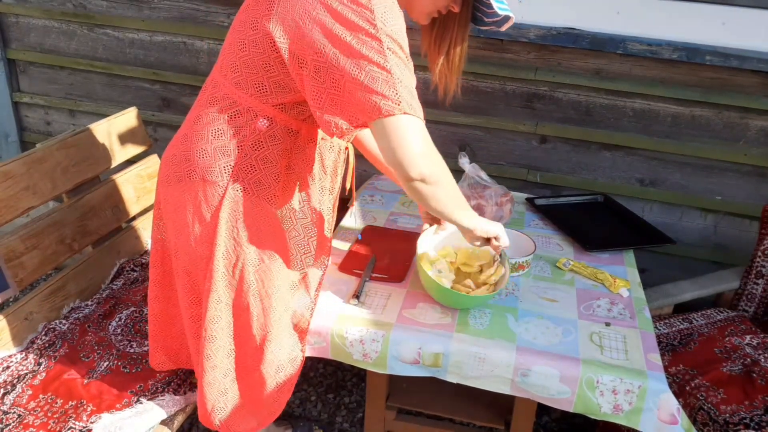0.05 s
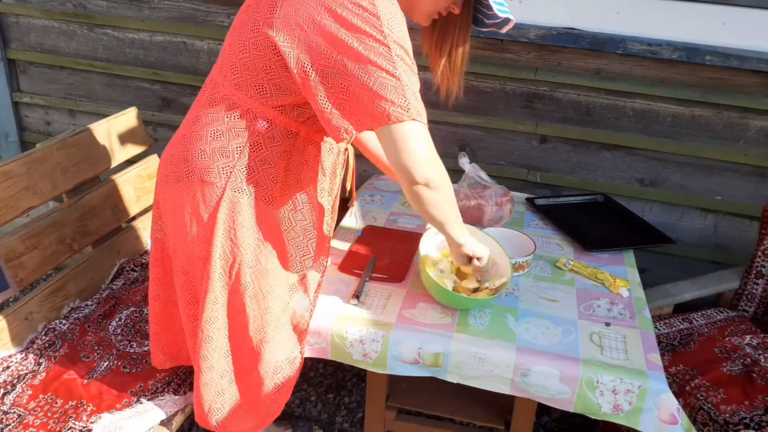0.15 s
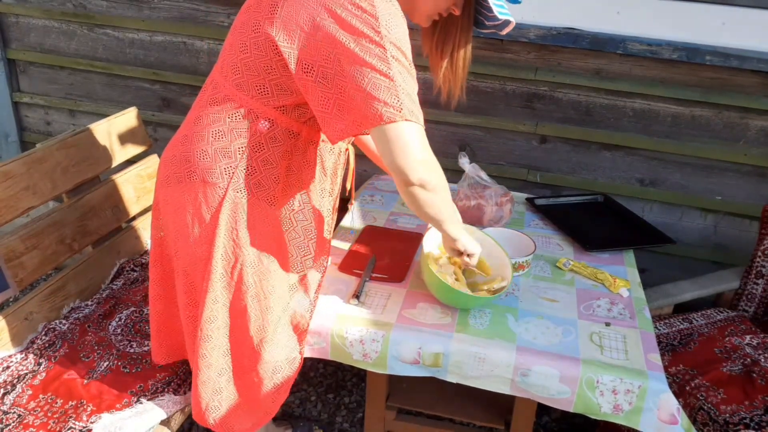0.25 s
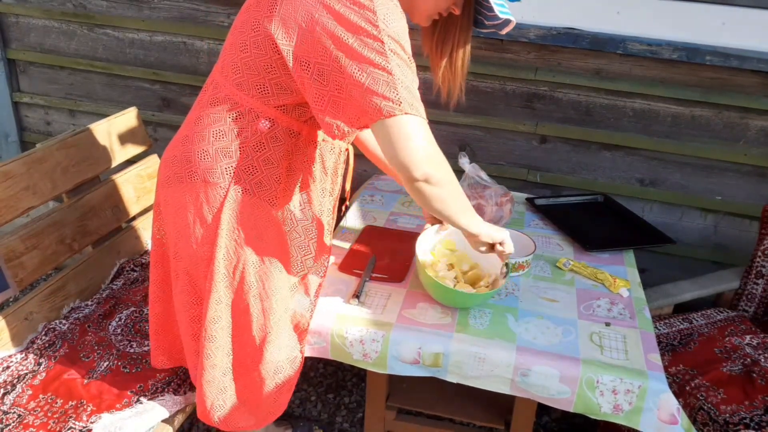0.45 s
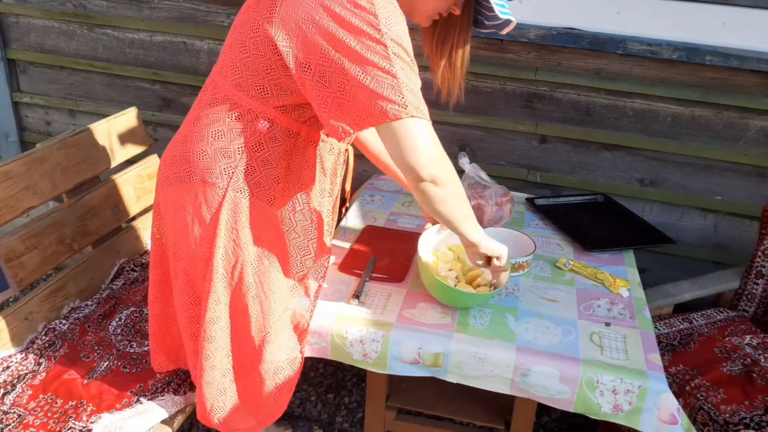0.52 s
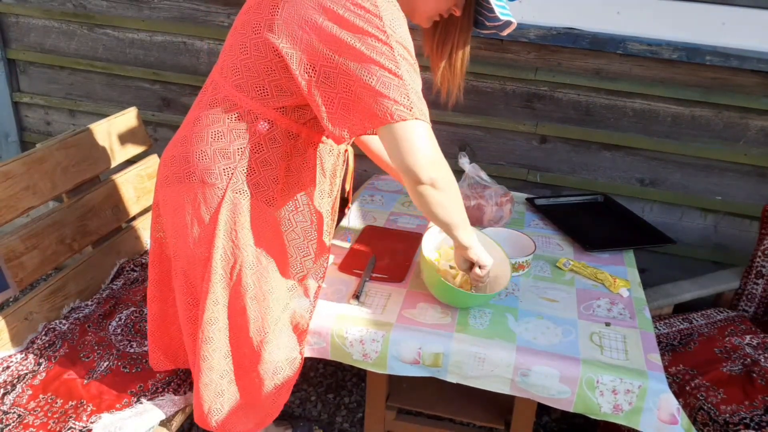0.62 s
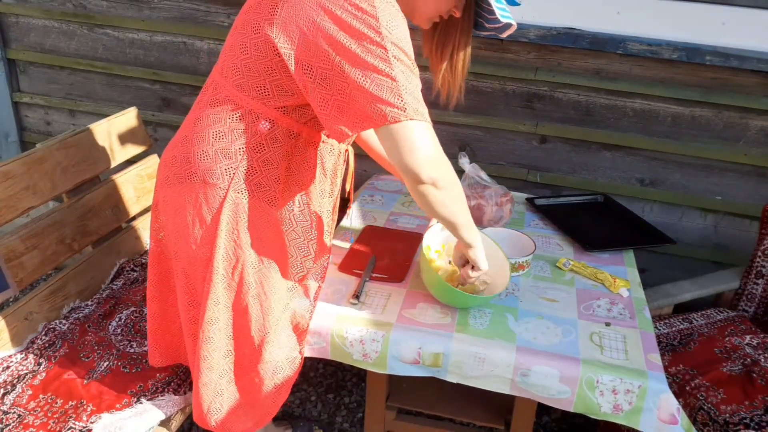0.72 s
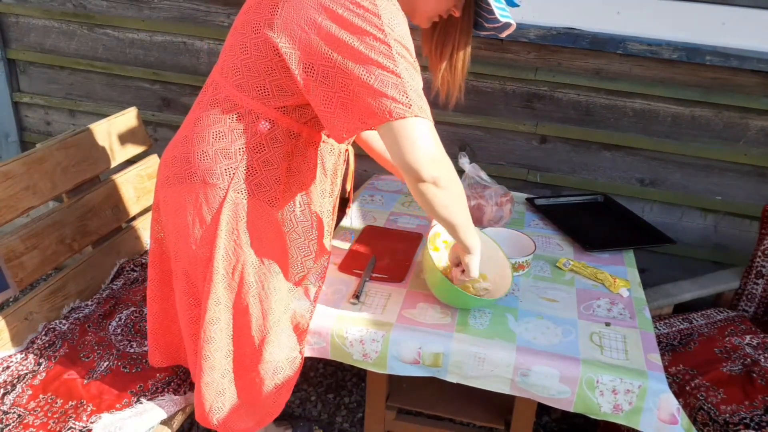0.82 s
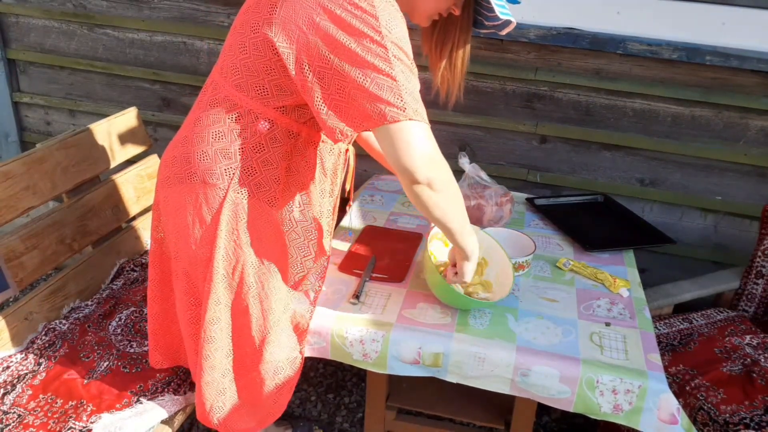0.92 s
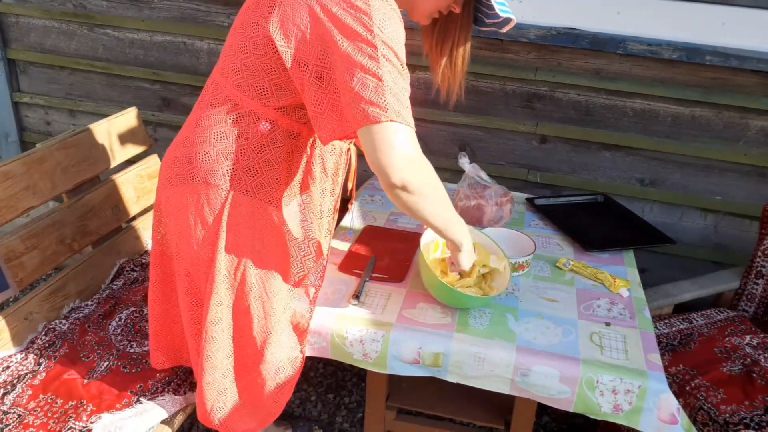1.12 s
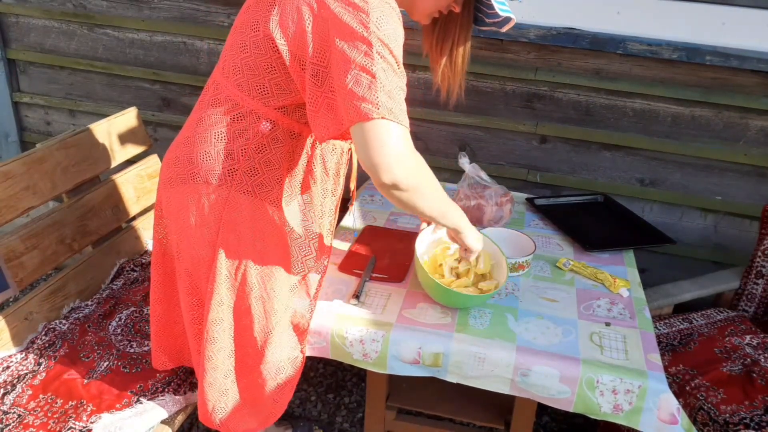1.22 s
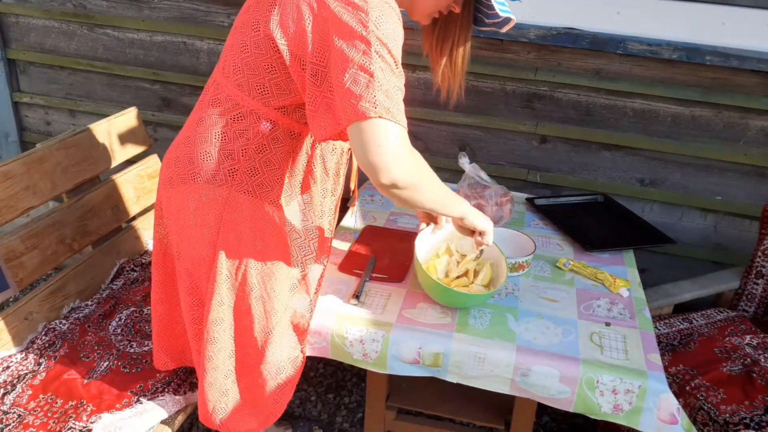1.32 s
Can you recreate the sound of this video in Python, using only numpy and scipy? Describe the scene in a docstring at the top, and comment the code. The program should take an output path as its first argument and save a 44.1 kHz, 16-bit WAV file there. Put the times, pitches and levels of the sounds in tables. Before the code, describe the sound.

Moist food is mixed by hand in a plastic bowl, close and slightly to the right. At about 0.2 seconds a squelch and dull knock sound, with a faint boom from the table and soft plops. More wet knocks and rubbing follow from 0.5 to 0.9 seconds, each with a quiet yard echo. After that, only very soft handling remains over a faint outdoor hush and low rumble.

```python
"""A faint outdoor hush and a low rumble come first, then moist food being turned by hand in a plastic bowl.
Fingers rub softly, and the wet pieces squelch and plop against the wall, making it ring briefly.
The bowl knocks on a garden table, whose top booms faintly under it.
Fences and a house wall throw each knock and plop back as quiet echoes."""
import sys
import numpy as np
from scipy import signal
from scipy.fft import rfft, irfft
from scipy.io import wavfile

SR = 44100
rng = np.random.default_rng(int(sys.argv[2]) if len(sys.argv) > 2 else 0)


def log_audio(samples):
    """Write samples as a 16-bit WAV file to the path given in sys.argv[1]."""
    # one column per channel
    frames = np.atleast_2d(samples).T
    # limit to full scale, then quantise
    limited = np.clip(frames, -1, 1)
    pcm = np.round(limited * 32767).astype(np.int16)
    wavfile.write(sys.argv[1], SR, pcm)


N = 59535
T = np.arange(N) / SR
BOWL_PAN_DB, LOW_PAN_DB = 2.4, 4.5   # how far the bowl and the deep sounds lean to the right


def from_db(db):
    """Turn decibels into a number to multiply by."""
    return 10 ** (np.asarray(db) / 20)


def rms_one(x):
    """Scale a sound so its average strength (rms) is 1."""
    return x / np.sqrt(np.mean(x ** 2) + 1e-20)


def at_hz(points, hz):
    """Read between the rows of a table, giving each octave equal room."""
    pitches, values = np.transpose(points)
    return np.interp(np.log(hz + 1e-9), np.log(pitches), values)


def keep_side(x, hz, side, order=2):
    """Keep the "low" or "high" side of hz; a higher order cuts more steeply."""
    return signal.sosfilt(signal.butter(order, hz, side, fs=SR, output="sos"), x + 1e-18)


def delayed(x, seconds):
    """The same sound, later."""
    return np.interp(T - seconds, T, x, left=0)


def to_right(db):
    """Turn the left channel down and the right one up."""
    return from_db([[-db], [db]])


def ring(hz, db, ring_s):
    """One struck tone; its ring time is how long it takes to fade by 60 dB."""
    return from_db(db - 60 * np.minimum(T / ring_s, 4)) * np.sin(2 * np.pi * hz * T)


def coloured(noise, colour):
    """Give noise a colour: make some pitches stronger than others."""
    gains = from_db(at_hz(colour, np.fft.rfftfreq(N, 1 / SR)))
    return rms_one(irfft(rfft(noise) * gains, N))


def stereo_noise(likeness):
    """White noise whose left and right are unrelated (0), the same (1) or in between."""
    mid, side = rng.standard_normal((2, N))
    return rms_one(np.sqrt(1 + likeness) * mid + np.sqrt(1 - likeness) * side * np.array([[1], [-1]]))


# colour of the hush (pitch [Hz], relative level [dB])
HUSH_COLOUR = [(88, -35.5), (150, -3.5), (315, -2.5), (534, -17.5), (716, -8.5), (821, -10.5), (998, -22.5),
               (1560, -5), (2100, -17.5), (2270, -24), (4320, -28), (8730, -31), (16000, -36)]
def hush(level_db=-68.5):
    """A steady, faraway outdoor hush."""
    noise = coloured(stereo_noise(0.13), HUSH_COLOUR)
    return from_db(level_db) * rms_one(keep_side(noise, 260, "high")) * to_right(4)


# colour of the rumble (pitch [Hz], relative level [dB])
RUMBLE_COLOUR = [(20, -19.5), (40, -25), (60, 0), (80, -6.5), (108, 4), (150, -5), (250, -39), (500, -26),
                 (2000, -82.5)]
# its rise and fall (time [s], relative level [dB])
RUMBLE_SWELLS = [(0, -66), (.09, -67.5), (.145, -55), (.19, -55), (.29, -60), (.37, -68.5), (.43, -63),
                 (.49, -69.5), (.58, -66.5), (.92, -76.5), (1.02, -61.5), (1.09, -70), (1.2, -70),
                 (1.29, -55), (1.35, -72)]
def rumble(gain_db=-3):
    """A low rumble that comes and goes."""
    loudness = from_db(gain_db + np.interp(T, *np.transpose(RUMBLE_SWELLS)))
    return loudness * coloured(stereo_noise(0.45), RUMBLE_COLOUR) * to_right(LOW_PAN_DB)


# strokes round the bowl (start [s], length [s], centre pitch [Hz], level [dB])
RUB_STROKES = [(0.033, 0.0092, 8000, -70.5), (0.382, 0.12, 998, -65), (0.522, 0.18, 337, -64),
               (0.819, 0.0096, 4250, -62.5), (0.821, 0.024, 2800, -49), (0.867, 0.13, 225, -65),
               (0.907, 0.18, 330, -71), (1.106, 0.037, 8000, -85.5), (1.312, .04, 7500, -80.5)]
def rubs(width_ratio=1.1):
    """Fingers and food rub the bowl: soft swells of noise, each around its own pitch."""
    out = 0
    for start, length, hz, db in RUB_STROKES:
        noise = keep_side(stereo_noise(0.49), hz * width_ratio, "low", order=3)
        noise = keep_side(noise, hz / width_ratio, "high", order=3)
        swell = np.sin(np.pi * np.clip((T - start) / length, 0, 1))
        out += from_db(db) * rms_one(noise) * swell
    return out * to_right(BOWL_PAN_DB)


# each squelch (start [s], fade time [s], level [dB])
SQUELCH_BURSTS = [(0.18, 0.075, -54.5), (0.507, 0.067, -54), (0.613, 0.017, -52), (.70, 0.24, -67),
                  (0.807, 0.047, -52.5), (0.899, 0.024, -67)]
# colour of the wet clicks (pitch [Hz], relative level [dB])
SQUELCH_COLOUR = [(1000, -4.5), (2000, 9.5), (3200, 0), (5000, -4), (8500, -7.5), (10500, -14.5),
                  (15000, -13)]
def squelches(rise_s=0.0017, clicks_per_s=8800, spread_db=2.5):
    """Wet food slides and parts in clouds of tiny clicks that swell quickly and fade."""
    loudness = 0
    for start, fade_s, db in SQUELCH_BURSTS:
        age = np.maximum(T - start, 0)
        loudness += from_db(db) * (1 - np.exp(-age / rise_s)) * np.exp(-age / fade_s)
    sizes = from_db(spread_db * np.minimum(rng.exponential(1, N), 4))
    clicks = (rng.random(N) < clicks_per_s / SR) * sizes * stereo_noise(0.1)
    return loudness * coloured(clicks, SQUELCH_COLOUR) * to_right(BOWL_PAN_DB)


# the bowl's own tones (pitch [Hz], relative level [dB], ring time [s])
WALL_TONES = [(253, -24.5, 0.044), (370, -6, 0.014), (623, -4.5, 0.017), (847, -1, 0.011),
              (1256, -2.5, 0.013), (1928, -9, 0.011), (2477, -14.5, .014), (3600, -19.5, .012),
              (5120, -21, .012), (5920, -23, .012), (6740, -19.5, 0.00826)]
def bowl_wall():
    """The plastic wall rings very briefly when struck; every other tone starts the opposite way."""
    return sum((-1) ** k * ring(*tone) for k, tone in enumerate(WALL_TONES))


# soft plops, and dull returns of the knocks from the garden walls (time [s], bowl gain [dB],
# blur time [s], treble limit [Hz], hollow pitch [Hz], hollow level [dB], hollow ring time [s])
SOFT_PLOPS_AND_ECHOES = [(0.1835, -34.5, 0.00077, 6760, 1794, -38, .03),
                         (.2615, -30.5, 0.008, 2660, 1245, -31, 0.054),
                         (.2770, -28, 0.0037, 2000, 1280, -29, 0.024),
                         (.3050, -51, 0.006, 1477, 692, -42.5, 0.043),
                         (.3440, -41, 0.0084, 1760, 1282, -43, 0.033),
                         (.5070, -68, .004, 2500, 362, -52.5, 0.084),
                         (.5555, -39, 0.0089, 4960, 1380, -48, 0.028),
                         (.5640, -43.5, 0.0083, 2000, 728, -46.5, 0.12),
                         (0.6115, -42.5, 0.015, 4000, 1760, -47, 0.057),
                         (0.691, -43, 0.0021, 1200, 548, -45.5, 0.076),
                         (.7270, -32, 0.0059, 1336, 571, -41, 0.055),
                         (0.7502, -32.5, 0.0082, 1640, 795, -41.5, 0.041),
                         (0.7891, -31, 0.0023, 2670, 778, -40.5, 0.13),
                         (.8165, -26.5, 0.0027, 5900, 1126, -28, 0.057),
                         (.8235, -28.5, 0.002, 5870, 741, -38.5, 0.11),
                         (0.8286, -29, 0.0074, 3400, 390, -50, 0.042),
                         (.8465, -39, 0.0098, 3000, 670, -25, 0.029),
                         (1.106, -62, 0.004, 3220, 359, -53.5, 0.02),
                         (1.191, -63.5, 0.0064, 1217, 584, -56, 0.049),
                         (1.227, -57.5, 0.012, 1200, 573, -57, 0.046),
                         (1.307, -59.5, .008, 1210, 640, -61.5, 0.068)]
def plops_and_echoes(wall, rise_s=0.00088, taps_per_s=1600):
    """Soft plops and dull echoes of the knocks: the bowl's ring, blurred, plus a hollow tone."""
    out = np.zeros(N)
    for start, db, blur_s, treble_hz, hollow_hz, hollow_db, ring_s in SOFT_PLOPS_AND_ECHOES:
        taps = (rng.random(N) < taps_per_s / SR) * rng.standard_normal(N)
        swell = T * np.exp(-np.minimum(2 * T / blur_s, 60))
        blurred = signal.fftconvolve(taps * swell, wall)[:N]   # one copy of the ring for each tiny tap
        blurred *= from_db(db) * np.std(wall) / (np.std(blurred) + 1e-30)
        hollow = ring(hollow_hz, hollow_db, ring_s) * (1 - np.exp(-T / rise_s))
        out += delayed(keep_side(blurred + hollow, treble_hz, "low"), start)
    return out


# hard hits (time [s], bowl gain [dB], bass limit [Hz], treble limit [Hz], hollow pitch [Hz],
# hollow level [dB], hollow ring time [s], clack pitch [Hz], clack level [dB], tick level [dB])
BOWL_KNOCKS = [(0.2071, -9, 232.3, 2900, 616, -17.5, 0.028, 3650, -49, -40.5),
               (.2098, -22.5, 400, 3000, 1285, -23.5, 0.027, 1930, -22, -39.5),
               (.2121, -12.5, 260, 1110, 577, -22.5, 0.023, 2540, -30, -50.5),
               (.5033, -33, 487, 3620, 1000, -34.5, 0.071, 4700, -42.5, -40.5),
               (0.5046, -20.5, 1400, 2300, 1610, -20.5, 0.012, 2150, -24, -39.5),
               (0.6563, -18.5, 310, 1840, 731, -33, 0.028, 2780, -27, -43.5),
               (.6615, -28, 285, 1210, 796, -29, 0.023, 1390, -36, -49),
               (.7995, -27, 2030, 4430, 676.4, -25, 0.067, 2130, -18, -28)]
def knocks(wall, clack_s=0.005, tick_hz=8200, tick_s=0.0025):
    """Each knock rings the bowl and the hollow between food and hand, with a clack and a wet tick."""
    out = np.zeros(N)
    for (start, db, bass_hz, treble_hz, hollow_hz, hollow_db, ring_s,
         clack_hz, clack_db, tick_db) in BOWL_KNOCKS:
        body = from_db(db) * keep_side(keep_side(wall, treble_hz, "low"), bass_hz, "high")
        hollow = keep_side(ring(hollow_hz, hollow_db, ring_s), treble_hz, "low")
        clack = keep_side(ring(clack_hz, clack_db, clack_s), clack_hz / 2, "high")
        tick = keep_side(ring(tick_hz, tick_db, tick_s), tick_hz / 2, "high")
        out += delayed(body + hollow + clack + tick, round(start * SR) / SR)
    return out


# the table top's own tones (pitch [Hz], level [dB], ring time [s])
TABLE_TONES = [(62, -55, 0.28), (115, -64.5, .3), (162, -53, 0.24)]
# moments when it gives under the bowl (time [s], gain [dB])
TABLE_THUMPS = [(0.207, 0), (0.533, -7), (0.798, -6.5)]
def table_booms(rise_s=0.015):
    """The table top booms faintly when the bowl is pressed down."""
    boom = sum(ring(*tone) for tone in TABLE_TONES) * (1 - np.exp(-T / rise_s))
    return sum(from_db(db) * delayed(boom, start) for start, db in TABLE_THUMPS) * to_right(LOW_PAN_DB)


def echo_fade(delay_s, db, ring_s):
    """The fading outline of a spray of tiny echoes; db sets its total energy."""
    fade = (T >= delay_s) * from_db(-60 * np.clip((T - delay_s) / ring_s, 0, 4))
    return from_db(db) * fade / np.sqrt(np.sum(fade ** 2))


# colours of the scattered sound and of the wall echoes (pitch [Hz], relative level [dB])
SCATTER_COLOUR = [(100, -5.5), (220, -5.5), (370, 3.5), (630, -2.5), (850, -0.5), (1200, -1), (2500, 5),
                  (5000, -3), (12000, -1)]
ECHO_COLOUR = [(150, -11.5), (400, -1), (700, -12.5), (1250, -2), (2500, -0.5), (5000, -20), (15000, -19.5)]
# echoes off the fences and house wall (delay [s], level [dB], ring time [s])
WALL_ECHOES = [(.054, -29.5, .04), (.069, -33, 0.031), (0.095, -37.5, .04), (.135, -48, 0.049)]
# how long the yard rings on (pitch [Hz], ring time [s])
YARD_RING_TIMES = [(150, 0.52), (600, 0.17), (1500, 0.4), (4000, 0.22), (12000, 0.331)]
def yard_echoes(sound, likeness=0.19):
    """Sound scatters off the table and near fence, returns from farther walls and leaves a short tail."""
    scatter = coloured(stereo_noise(likeness), SCATTER_COLOUR)
    echoes = scatter * echo_fade(delay_s=0.0025, db=-10.5, ring_s=0.091)
    echoes += coloured(stereo_noise(likeness), ECHO_COLOUR) * sum(echo_fade(*e) for e in WALL_ECHOES)
    tail_spectrum = rfft(coloured(stereo_noise(likeness), SCATTER_COLOUR))
    hz = np.fft.rfftfreq(N, 1 / SR)
    for low_hz in 80 * 2 ** np.arange(8):   # each octave fades at its own speed
        octave = irfft(tail_spectrum * (hz >= low_hz) * (hz < 2 * low_hz), N)
        ring_s = at_hz(YARD_RING_TIMES, low_hz * np.sqrt(2))
        echoes += octave * echo_fade(delay_s=0.014, db=-14.5, ring_s=ring_s)
    return signal.fftconvolve(echoes, sound[None], axes=1)[:, :N] * to_right(2)


def close_by(sound, bounce_s=0.00452, bounce_db=-15.5, left_lag_s=0.00003):
    """The sound plus one dull bounce off the table; the left side hears it later and duller."""
    bounce = delayed(keep_side(sound, 2020, "low", order=1), bounce_s)
    right = sound + from_db(bounce_db) * bounce
    left = delayed(keep_side(right, 8980, "low", order=1), left_lag_s)
    return np.array([left, right]) * to_right(BOWL_PAN_DB)


def scene(bass_hz=170, treble_hz=9800):
    """The bowl stands a little to the right, on a table in a fenced yard."""
    wall = bowl_wall()
    bowl = keep_side(plops_and_echoes(wall) + knocks(wall), bass_hz, "high", order=3)
    bowl = keep_side(bowl, treble_hz, "low", order=3)
    return close_by(bowl) + yard_echoes(bowl) + squelches() + rubs() + table_booms() + hush() + rumble()


def record(dry, bass_hz=33.8, top_hz=16100):
    """The microphone drops the deepest bass; the highest treble is cut steeply."""
    top_cut = signal.ellip(10, .1, 70, top_hz, fs=SR, output="sos")
    return signal.sosfilt(top_cut, keep_side(dry, bass_hz, "high", order=3))


dry = scene()
out = record(dry)
log_audio(out)
```